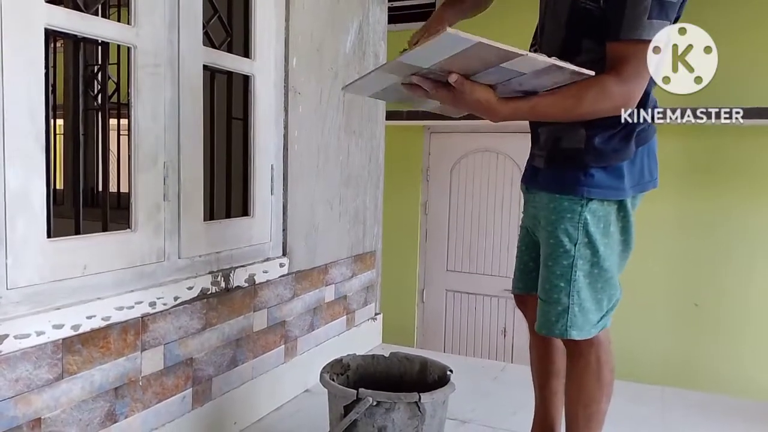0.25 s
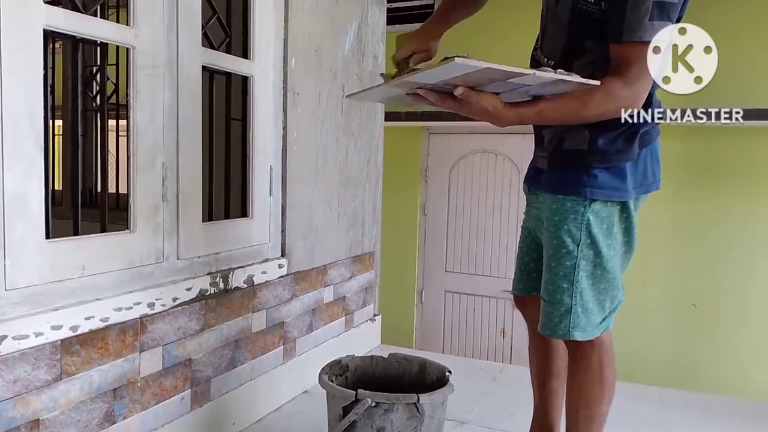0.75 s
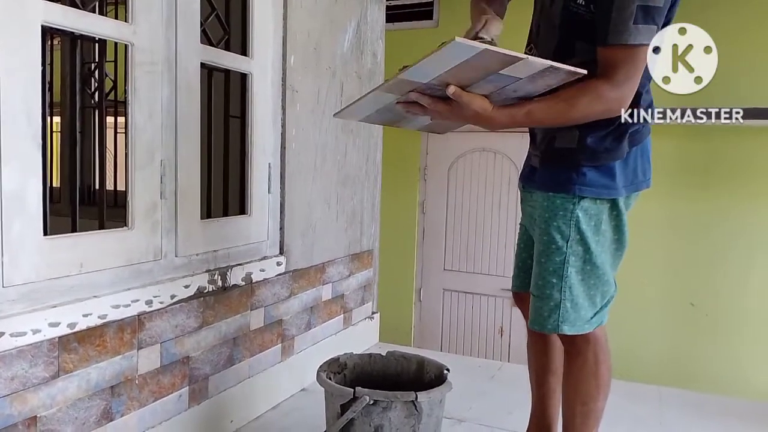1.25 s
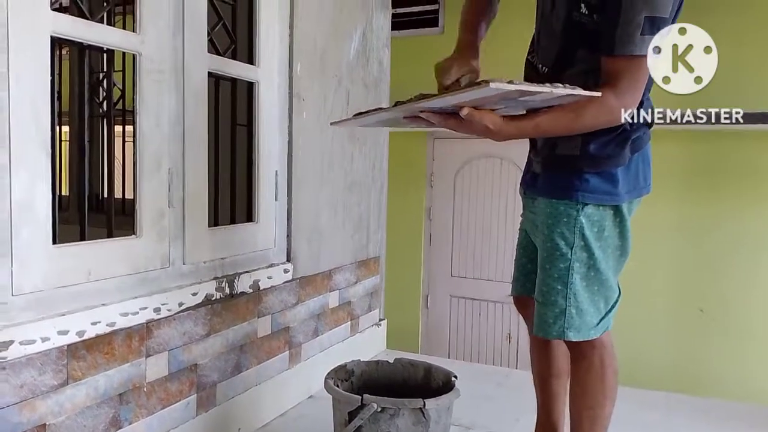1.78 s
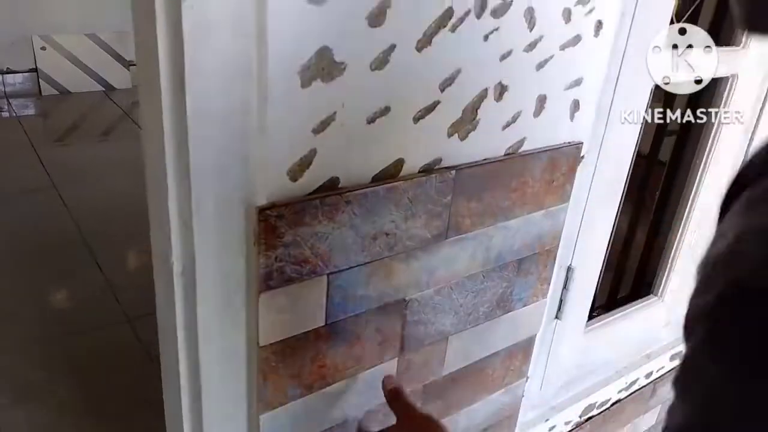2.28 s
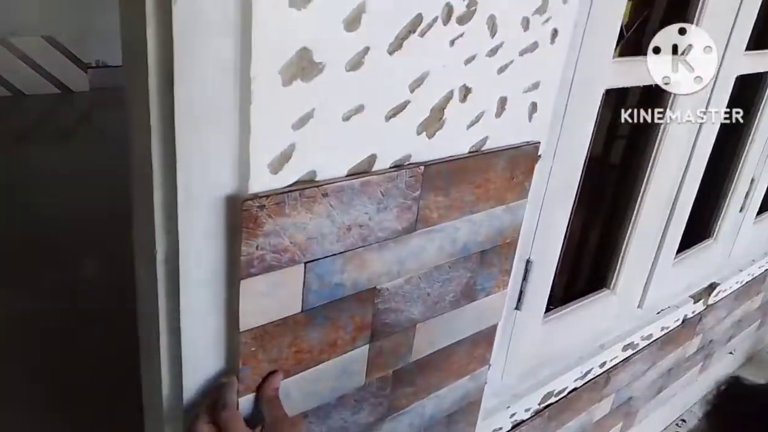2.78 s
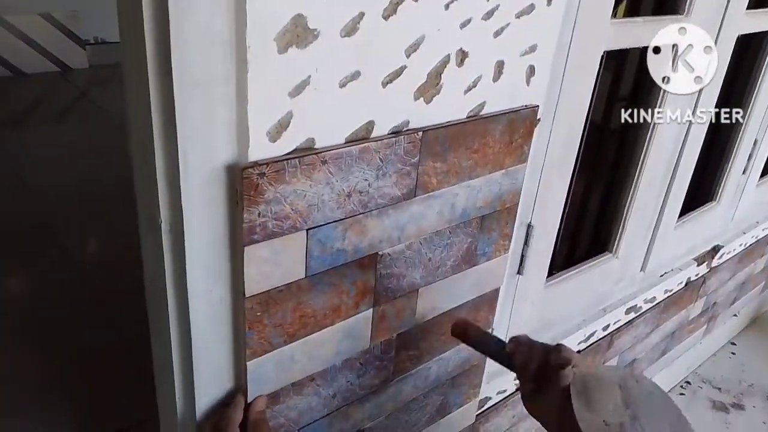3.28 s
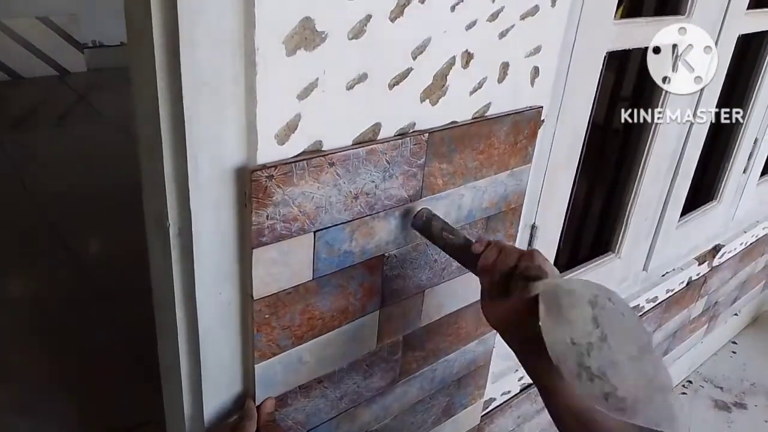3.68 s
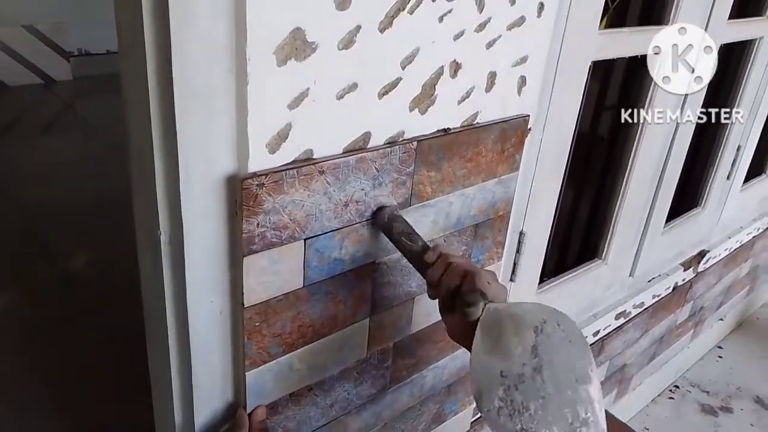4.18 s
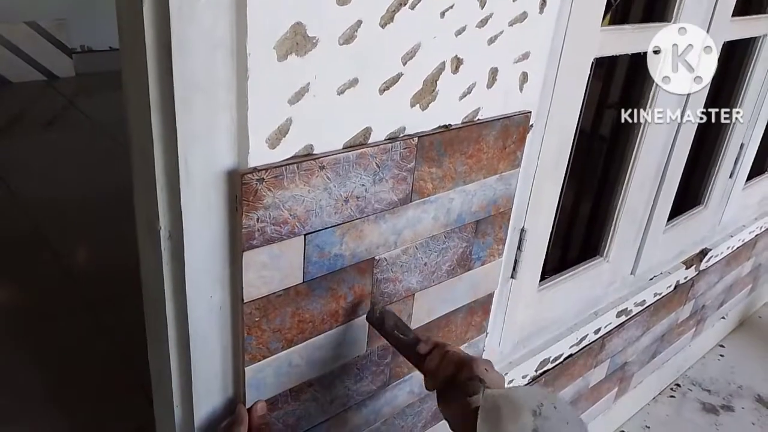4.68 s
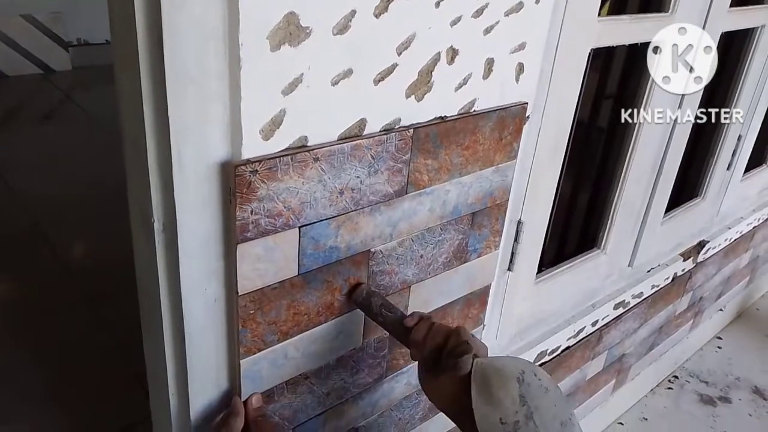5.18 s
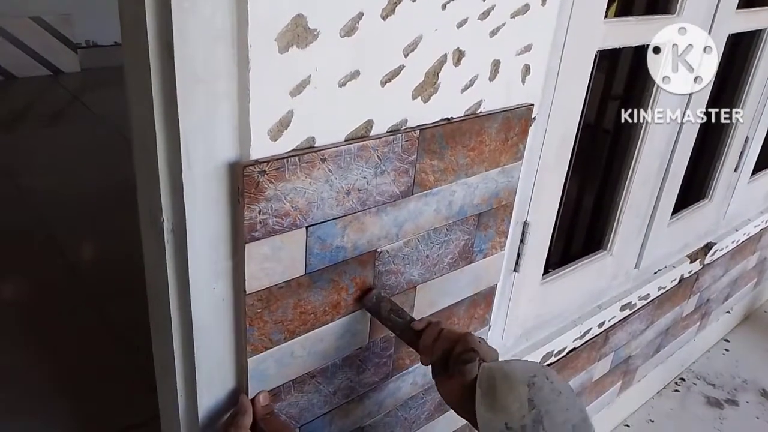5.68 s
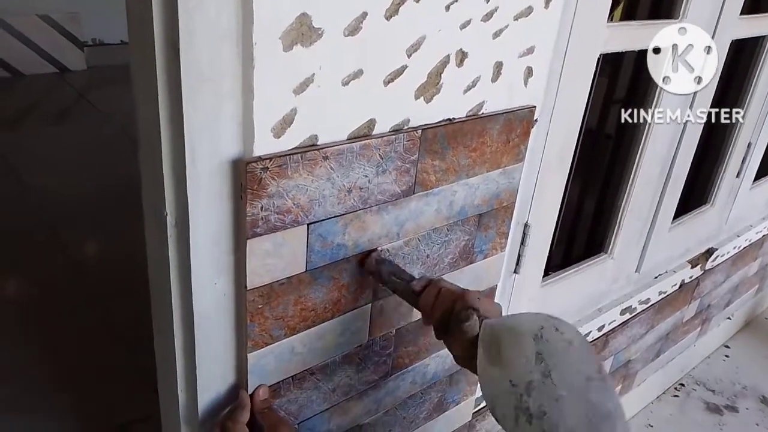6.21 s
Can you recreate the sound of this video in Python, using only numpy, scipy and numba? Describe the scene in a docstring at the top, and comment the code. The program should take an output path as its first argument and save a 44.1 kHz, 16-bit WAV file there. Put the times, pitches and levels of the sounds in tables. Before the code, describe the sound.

After a few sharp metallic clinks, a steady run of hard, hollow, ringing tile taps with a trowel handle echoes in a bare porch.

```python
"""A trowel's handle butt taps a ceramic tile into mortar, five times a second, in a hard, echoing porch.
Each tap is a shaped knock plus the ringing steel blade; most spots sound hollow at first and firm up,
and harder taps are brighter. Before that the blade clinks as the tiler takes it up: cracks plus decaying tones.
Rubs are swells of noise, a faint squeak is two sine tones, and the outdoor background is steady hiss.
A phone's limiter ducks each blow, so that the echo swells up just after it."""
import sys
import numpy as np
from scipy import signal
from scipy.fft import rfft, irfft
from scipy.io import wavfile
from numba import njit

SR = 44100
rng = np.random.default_rng(int(sys.argv[2]) if len(sys.argv) > 2 else 0)


def persist_wave(psi):
    """Save psi, clipped to +-1, as 16-bit WAV."""
    counts = np.round(np.clip(psi, -1, 1) * 32767).astype(np.int16)
    wavfile.write(sys.argv[1], SR, np.atleast_2d(counts).T)


N = 284445
RING = SR   # samples that one blow lasts
AGE = np.arange(RING) / SR   # seconds since the blow
GRID = np.maximum(np.arange(RING // 2 + 1) * SR / RING, 1)   # the pitches in a spectrum, in Hz
CUTOFF_HZ = 15600   # nearly nothing is kept above this


def from_db(db):
    """Turn decibels into a gain."""
    return 10 ** (np.asarray(db) / 20)


def at_hz(points, hz):
    """Read a table of (f/Hz, level/dB) between its rows, on a log-frequency axis."""
    table_hz, table_db = np.array(points).T
    return np.interp(np.log(hz), np.log(table_hz), table_db)


def fade(t60):
    """Exponential decay over one blow: 60 dB down after t60 seconds."""
    return np.exp(-np.log(1000) * AGE / t60)


def bump(hz, width_hz):
    """Bell shape of a resonance: 1 on top, one half at half the width to either side."""
    return 1 / (1 + (2 * (GRID - hz) / width_hz) ** 2)


def pulse(curve_db):
    """The pulse with this spectrum that starts as promptly as possible (minimum phase)."""
    cepstrum = irfft(np.log(from_db(curve_db)), RING)
    # folding the second half onto the first leaves nothing before time zero
    cepstrum[1:RING // 2] *= 2
    cepstrum[RING // 2 + 1:] = 0
    return irfft(np.exp(rfft(cepstrum)), RING)


def unit_power(curve_db):
    """Shift a spectrum to a mean power of 1."""
    return curve_db - 10 * np.log10(np.mean(from_db(curve_db) ** 2))


def add(out, s, sound):
    """Mix a sound in at time s, in seconds."""
    start = round(s * SR)
    out[start:start + len(sound)] += sound[:N - start]


# tone colour of the outdoor background: (f/Hz, relative level/dB)
AIR_COLOUR = [(24, -33), (60, -28), (150, -10.5), (210, -13.5), (265, -28), (370, -4.5), (480, 0.5),
              (650, -4.5), (1100, -3), (2000, -8), (3700, 1.5), (6000, -10), (9500, -19), (12000, -50),
              (16000, -32)]
# loudness of the background, nearly silent at the very start: (t/s, level/dB)
AIR_LEVEL = [(0, -112), (.435, -106), (0.446, -67.5), (1.4, -68), (6.45, -68.5)]


def air():
    """Faint hiss of the surroundings: random noise shaped by a filter."""
    hiss = signal.fftconvolve(rng.standard_normal(N), pulse(unit_power(at_hz(AIR_COLOUR, GRID))))[:N]
    level_db = np.interp(np.arange(N) / SR, *np.transpose(AIR_LEVEL))
    return hiss * from_db(level_db)


# echo tail of the porch, band by band: (f/Hz, time to fall 60 dB t/s, relative level/dB)
PORCH_TAIL = [(150, 0.55, -2), (400, 0.79, -2), (1010, 0.56, 0), (2900, 0.59, -2.5), (7040, 0.49, -1),
              (13800, 0.3, 0)]


def echoes(near_db, near_t60, far_db):
    """Paths from one spot: quick reflections off nearby wall and floor, then the porch's tail, dying by band."""
    centres_hz = np.array(PORCH_TAIL)[:, 0]
    white = rfft(rng.standard_normal(RING))
    tail = np.zeros(RING)
    # neighbouring bands cross-fade into each other
    for share, (_, t60, level_db) in zip(np.eye(len(PORCH_TAIL)), PORCH_TAIL):
        band = np.interp(np.log(GRID), np.log(centres_hz), share)
        tail += irfft(white * band, RING) * fade(t60) * from_db(level_db)
    near = rng.standard_normal(RING) * fade(near_t60)
    return from_db(near_db) * near + from_db(far_db) * tail


# ringing tones (modes) of the trowel blade: (f/Hz, time to fall 60 dB t/s,
# relative level/dB when shaken through the handle, relative level/dB when knocked directly)
BLADE_MODES = [(1637, .7, -20, -20), (1811, .38, -8, -12), (2257, .27, -26, -9), (2392, .42, -22, -14),
               (2478, .28, -20, -4), (2530, .36, -15, -9), (3058, .32, 2, -20), (3320, .7, -2, -1),
               (3590, .35, -15, -9), (3651, .35, -14, -10), (3785, .25, -4, -14), (4036, .42, -16, -6),
               (4139, .26, 2, -17), (4327, .7, -9, -10), (4455, .55, -4, -14), (4524, .85, -10, -3),
               (4616, .45, -24, -9), (4737, .3, -3, -9), (5330, .5, -16, -18), (5660, .35, -16, -12),
               (5732, .38, -11, -4), (5850, .3, -28, -10), (6064, .54, -15, 3), (6712, .42, -24, -13),
               (7190, .3, -23, -15), (7403, .32, -23, -8), (9170, .28, -38, -14), (9850, .25, -42, -20),
               (10550, .22, -45, -21)]


def blade(levels_db, spread_db):
    """The blade's modes: fading sines with random phases, their strengths scattered by spread_db."""
    hz, t60 = np.array(BLADE_MODES).T[:2]
    gains = from_db(levels_db + spread_db * rng.standard_normal(len(hz)))
    phases = rng.uniform(0, 2 * np.pi, len(hz))
    return sum(gain * np.sin(2 * np.pi * f * AGE + phase) * fade(t)
               for f, t, gain, phase in zip(hz, t60, gains, phases))


def shimmer(modes_hz, levels_db, t60):
    """The blade's many weak overtones, each hit by chance; high ones die sooner."""
    gains = from_db(levels_db) * rng.standard_normal(len(modes_hz))
    lives = t60 * (np.median(modes_hz) / modes_hz) ** .5
    return sum(gain * np.sin(2 * np.pi * hz * AGE) * fade(life)
               for gain, hz, life in zip(gains, modes_hz, lives))


# contact noise of steel: (f/Hz, relative level/dB)
STEEL_CRACK = [(100, -32), (450, -33), (1200, -17), (1800, -15.5), (2400, -6), (2850, -9.5), (3700, 1),
               (4500, -6.5), (5100, -5.5), (6000, -7.5), (8000, -6.5), (10500, -17), (11200, -25),
               (16000, -27)]
# direct knocks on the blade: (t/s, force level/dB, ringing level/dB on top of the force,
# f/Hz that the struck spot favours, lift level/dB there)
BLADE_KNOCKS = [(.4446, -14, -18, 5200, 5), (.7023, -23, -2, 5400, 5), (.731, -11, 0, 3650, 6),
                (.786, -1, -1, 2450, 5), (.81, -6, -3, 6000, 3)]


def clinks(blade_db, shimmer_db, lift_db, width_hz, spot_width_hz, count):
    """Steel knocks on something hard: a brief bright crack coloured by the blade, which then rings freely."""
    out = np.zeros(N)
    mode_hz, _, _, mode_db = np.array(BLADE_MODES).T
    nearest_mode = np.max([bump(hz, width_hz) for hz in mode_hz], axis=0)
    colour = unit_power(at_hz(STEEL_CRACK, GRID) + lift_db * nearest_mode)
    # a plate's modes lie about evenly along the frequency axis
    places = (np.arange(count) + rng.random(count)) / count
    weak_hz = mode_hz[0] + places * (CUTOFF_HZ - mode_hz[0])
    # the ringing builds up, then the hand soon damps its first strong swing
    swing = (1 + 1.6 * fade(0.072)) * (1 - fade(0.019))
    for s, force_db, ring_db, spot_hz, spot_db in BLADE_KNOCKS:
        spot = spot_db * bump(spot_hz, spot_width_hz)
        paths = echoes(near_db=-36, near_t60=.15, far_db=-48)
        crack = signal.fftconvolve(pulse(colour + spot), paths)[:RING]
        ringing = from_db(blade_db) * blade(mode_db + np.interp(mode_hz, GRID, spot), spread_db=0.0)
        weak_db = np.interp(weak_hz, GRID, colour + spot)
        ringing += from_db(shimmer_db) * shimmer(weak_hz, weak_db, t60=0.34)
        add(out, s, from_db(force_db) * (crack + from_db(ring_db) * ringing * swing))
    return out


# hands and grit rubbing on tile and steel: (middle t/s, length t/s, level/dB, middle of the band f/Hz)
RUBS = [(0.505, 0.007, -55.5, 3250), (0.675, 0.072, -71, 4120), (1.087, 0.11, -73.5, 5800),
        (1.445, 0.083, -78, 5940), (2.713, 0.043, -62, 7000), (4.771, 0.035, -57, 5460)]


def scuffs():
    """Short rubs: a swell of broad gritty hiss."""
    out, time = np.zeros(N), np.arange(N) / SR
    for s, length, level_db, hz in RUBS:
        edges_hz = [hz / 2, min(hz * 1.4, SR / 2 - 100)]
        band = signal.butter(2, edges_hz, "band", fs=SR, output="sos")
        hiss = signal.sosfilt(band, rng.standard_normal(N))
        swell = np.exp(-2 * ((time - s) / length) ** 2)
        out += from_db(level_db) * hiss / hiss.std() * swell
    return out


# faint thin squeak among the clinks, one row:
# (middle t/s, length t/s, fundamental f/Hz, fundamental level/dB, octave level/dB)
SQUEAK_TONE = (.665, .065, 1606, -74, -70)


def squeak():
    """A faint thin tone with its octave swells and fades."""
    s, length, hz, first_db, octave_db = SQUEAK_TONE
    time = np.arange(N) / SR
    phase = 2 * np.pi * hz * time
    tone = from_db(first_db) * np.sin(phase) + from_db(octave_db) * np.sin(2 * phase)
    return tone * np.exp(-2 * ((time - s) / length) ** 2)


# blows of the handle on the tile: (t/s, force level/dB)
HANDLE_TAPS = [(1.4896, 0.6), (1.7857, -0.8), (1.9793, -5.5), (2.163, -1.1), (2.3747, -1), (2.5835, -0.5),
               (2.7785, -2), (2.997, -0.7), (3.1948, -0.8), (3.4129, -0.5), (3.601, -0.9), (3.8128, -1.5),
               (3.9984, 0.5), (4.2046, 0.5), (4.4207, -1), (4.6313, -0.1), (4.8169, -1.4), (5.0076, -0.2),
               (5.1812, -0.2), (5.3656, -1.1), (5.5393, -0.1), (5.7287, -1.5), (5.9114, -0.9), (6.0874, -1),
               (6.28, -5.5)]
# spots that the handle moves to: (from t/s, hollow note f/Hz, its lift level/dB at the first blow,
# favoured bending mode of the tile f/Hz, its lift level/dB)
TILE_SPOTS = [(1.4, 531, 12.5, 3400, 1.5), (2.3, 560, 4.5, 2600, 2.5), (2.5, 540, 4, 3052, 2),
              (2.7, 550, 2.5, 3050, 4), (3.5, 660, 2, 4110, 8), (4.1, 700, 4, 3500, 2),
              (4.3, 750, 12.5, 4440, 8), (4.55, 670, 3.5, 3325, 7), (4.7, 474, 4, 3233, 5.5),
              (4.9, 795, 3, 4145, 0), (5.1, 719, 3.5, 3440, 4.5), (5.45, 1000, 4, 3670, 2),
              (5.65, 520, 2, 4420, 6), (6.0, 740, -1, 2520, 2.5)]
# knock of the bedded tile: (f/Hz, relative level/dB)
TILE_KNOCK = [(40, -38.5), (110, -44), (170, -21.5), (260, -34), (330, -9), (420, -3), (600, -4),
              (780, -3.5), (920, -3.5), (1150, -8), (2100, -6.5), (3300, 2.5), (4200, -1), (4900, -6.5),
              (5800, -9.5), (8000, -22.5), (15000, -63)]
# resonances of the tile: (f/Hz, width f/Hz, lift level/dB)
TILE_RESONANCES = [(460, 67, 1), (580, 50, 2), (720.6, 12, 4), (917, 125, 4), (1270, 84, 4.5),
                   (1822, 124, 7.5), (2528, 132, 6.5), (3088, 97, 4.5), (3777, 160, 5), (4050, 110, 3)]
# lift of the low knock, which mostly dies down as the tile beds in: (t/s, level/dB)
LOW_KNOCK_LIFT = [(1.5, 0), (3.3, 1), (4.2, -0.5), (4.6, -5), (4.85, -1), (5.25, -6), (5.6, -2),
                  (6.3, -2.5)]
# standing waves of the porch: (f/Hz, level/dB before the shared lift below)
STANDING_WAVES = [(430.7, -59), (506.0, -63), (554.5, -61.5), (586.8, -72), (635.2, -59), (710.6, -63.5),
                  (877.5, -62)]
STANDING_LIFT_DB, STANDING_T60_S = 6.5, 0.63
HOLLOW_LEFT = 0.51   # share of a spot's hollow lift that outlasts each blow
# a harder blow is a shorter contact: dB of treble per dB of force, and treble lift at 0 dB force
BRIGHT_PER_FORCE, BRIGHT_DB = 0.9, 1.0
LOW_PER_SOFTNESS = 0.84   # a softer blow keeps its lows: dB of lift per dB less force
# well below these pitches a blow's echo pattern stays like that of the blow before
SAME_SPOT_HZ, NEW_SPOT_HZ = 15960, 2870


def taps(direct_db, blade_db, hollow_width_hz, ping_width_hz, low_hz, low_width_hz, dull_hz, bright_hz):
    """Taps knock the tile and shake the blade; the echo changes as the handle wanders, most in the treble."""
    out, paths = np.zeros(N), np.zeros(RING)
    resonances = sum(lift * bump(hz, width) for hz, width, lift in TILE_RESONANCES)
    body = unit_power(at_hz(TILE_KNOCK, GRID) + resonances)
    # how much each pitch counts as bass or as treble, 0 to 1
    bass = 1 / (1 + (GRID / dull_hz) ** 4)
    treble = 1 / (1 + (bright_hz / GRID) ** 4)
    standing = sum(from_db(STANDING_LIFT_DB + db) * np.sin(2 * np.pi * hz * AGE) for hz, db in STANDING_WAVES)
    standing = standing * fade(STANDING_T60_S)
    for s, force_db in HANDLE_TAPS:
        since, hollow_hz, hollow_db, ping_hz, ping_db = [row for row in TILE_SPOTS if row[0] <= s][-1]
        earlier_blows = sum(since <= t < s for t, _ in HANDLE_TAPS)
        # blend the last blow's echo pattern with a new one, keeping the power
        alike = np.exp(-GRID / (SAME_SPOT_HZ if earlier_blows else NEW_SPOT_HZ)) if paths.any() else 0
        fresh = rfft(echoes(near_db=-17.0, near_t60=.11, far_db=-28.0))
        paths = irfft(alike * rfft(paths) + np.sqrt(1 - alike ** 2) * fresh, RING)
        # the mortar under the spot sets a hollow note; the spot itself favours one bending mode of the tile
        hollow = hollow_db * HOLLOW_LEFT ** earlier_blows * bump(hollow_hz, hollow_width_hz)
        ping = ping_db * bump(ping_hz, ping_width_hz)
        low = np.interp(s, *np.transpose(LOW_KNOCK_LIFT)) * bump(low_hz, low_width_hz)
        contact = (BRIGHT_DB + BRIGHT_PER_FORCE * force_db) * treble - LOW_PER_SOFTNESS * force_db * bass
        knock = pulse(body + hollow + ping + low + contact)
        echo = signal.fftconvolve(knock, (paths + standing)[:RING - RING // 10])[:RING]
        ringing = blade(np.array(BLADE_MODES)[:, 2], spread_db=1.0)
        sound = from_db(direct_db) * knock + echo + from_db(blade_db) * ringing
        add(out, s, from_db(force_db) * sound)
    return out


@njit
def limiter_gain(size, ceiling, attack, hold, release):
    """Gain drops on a peak over the ceiling, waits `hold` samples, then comes back quickly."""
    gain, peak, wait, now = np.ones(len(size)), ceiling, 0.0, 1.0
    for i in range(len(size)):
        wait -= 1
        if size[i] > peak:
            peak, wait = size[i], hold
        elif wait < 0:
            peak += (ceiling - peak) * release
        now += (ceiling / peak - now) * attack
        gain[i] = now
    return gain


def limited(x, ceiling_db, attack_s, hold_s, release_s):
    """Turn the sound down wherever its peaks pass the ceiling."""
    attack = 1 - np.exp(-1 / (attack_s * SR))
    release = 1 - np.exp(-1 / (release_s * SR))
    return x * limiter_gain(np.abs(x), float(from_db(ceiling_db)), attack, float(hold_s * SR), release)


def scene():
    """Background, trowel, small handling sounds and taps at one microphone."""
    trowel = clinks(blade_db=-42.0, shimmer_db=-61, lift_db=5.5, width_hz=120, spot_width_hz=1900, count=110)
    tile = taps(direct_db=-6.5, blade_db=-39.5, hollow_width_hz=160, ping_width_hz=160,
                low_hz=480, low_width_hz=740, dull_hz=1900, bright_hz=5400)
    return (air() + trowel + scuffs() + squeak() + tile)[None]


def record(dry):
    """The limiter ducks each blow; the first swings outrun it and are clipped; the highest treble is cut."""
    ducked = limited(dry[0], ceiling_db=-21.5, attack_s=0.000097, hold_s=.030, release_s=0.0012)
    top = from_db(-22.3)
    low_pass = signal.firwin(201, CUTOFF_HZ, window="blackman", fs=SR)
    return signal.fftconvolve(np.clip(ducked, -top, top), low_pass, "same")[None]


dry = scene()
out = record(dry)
persist_wave(out)
```